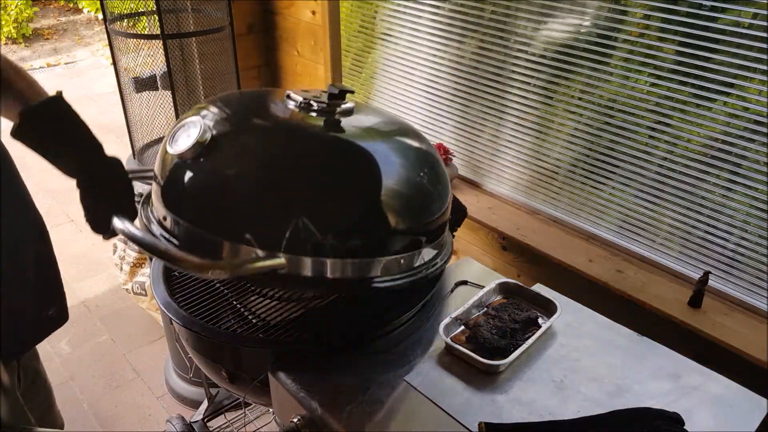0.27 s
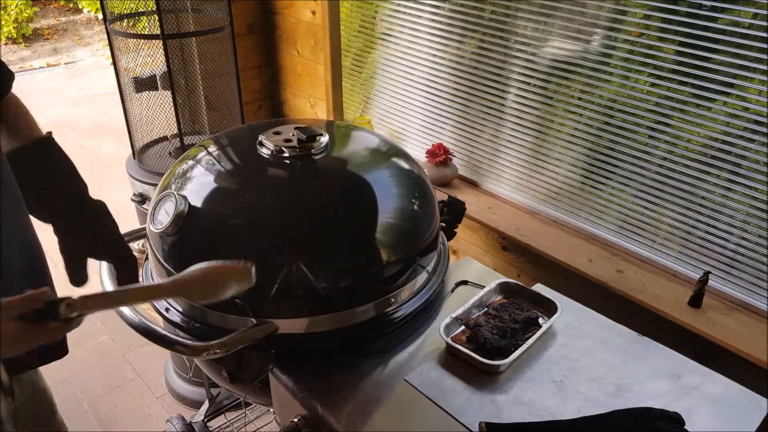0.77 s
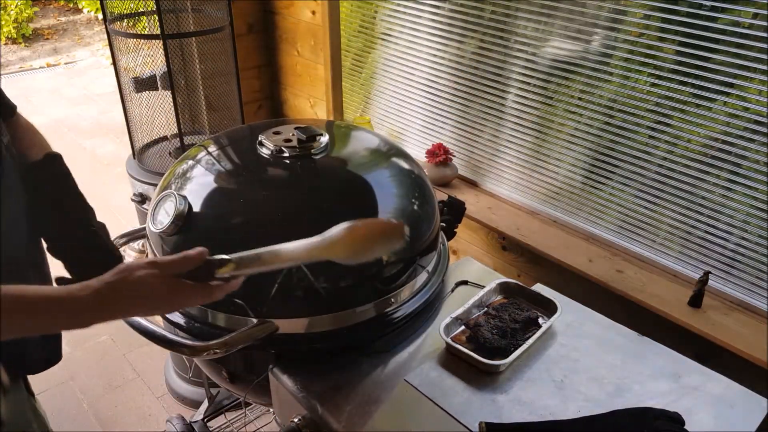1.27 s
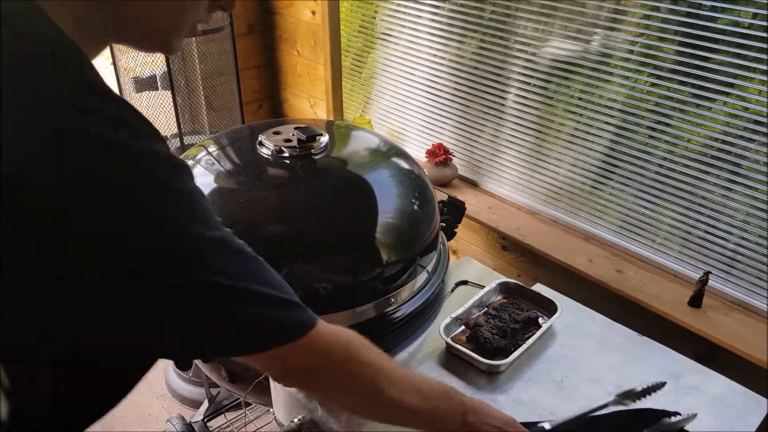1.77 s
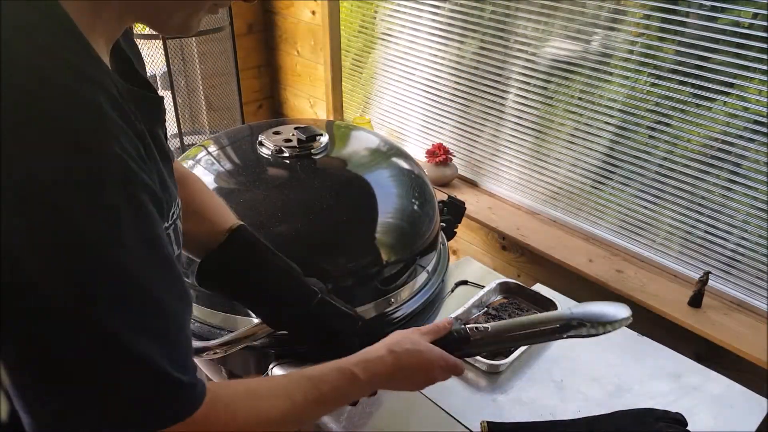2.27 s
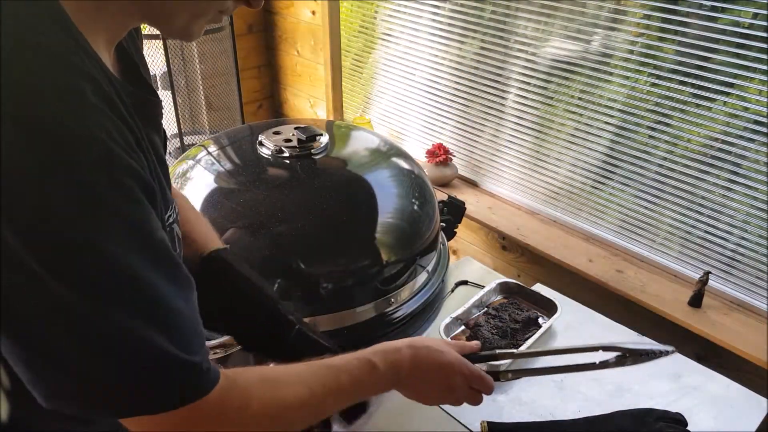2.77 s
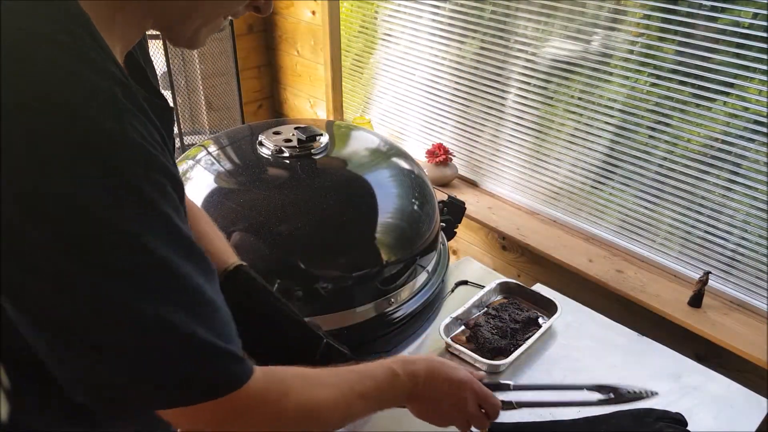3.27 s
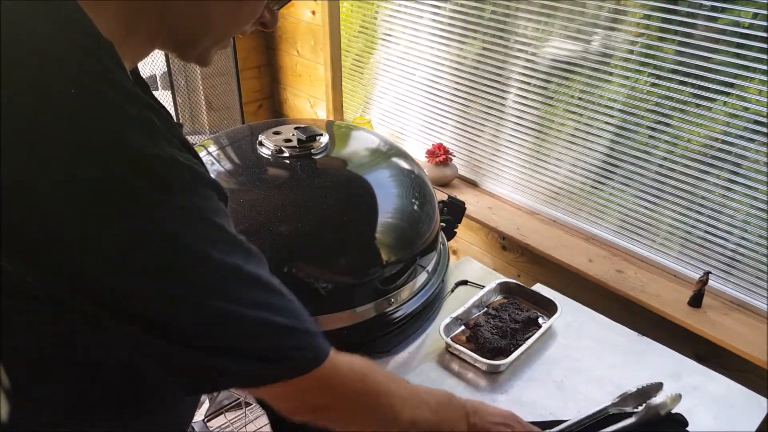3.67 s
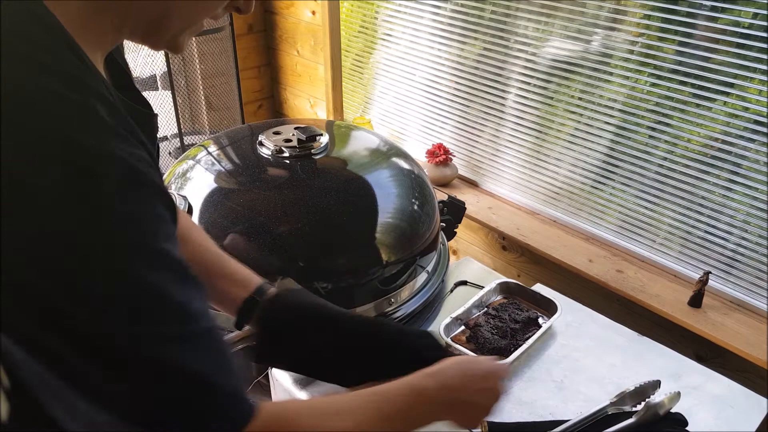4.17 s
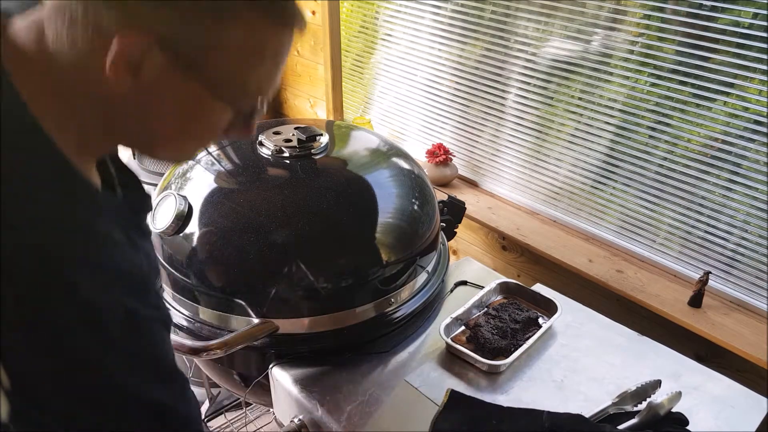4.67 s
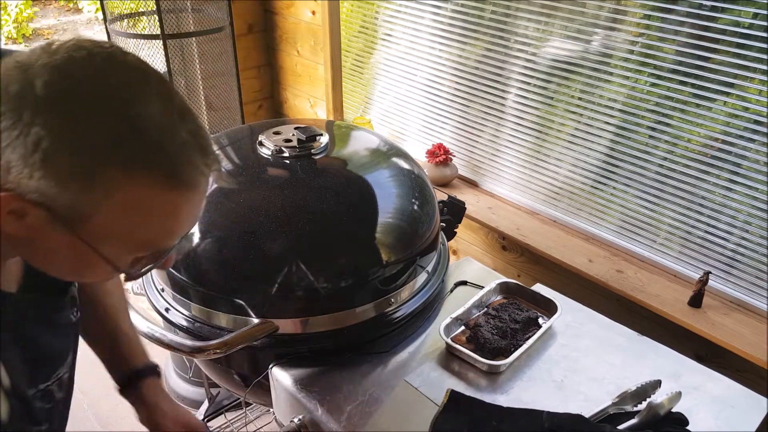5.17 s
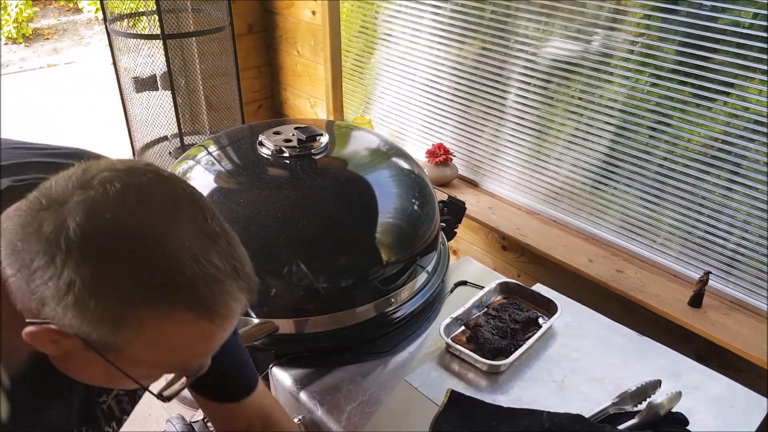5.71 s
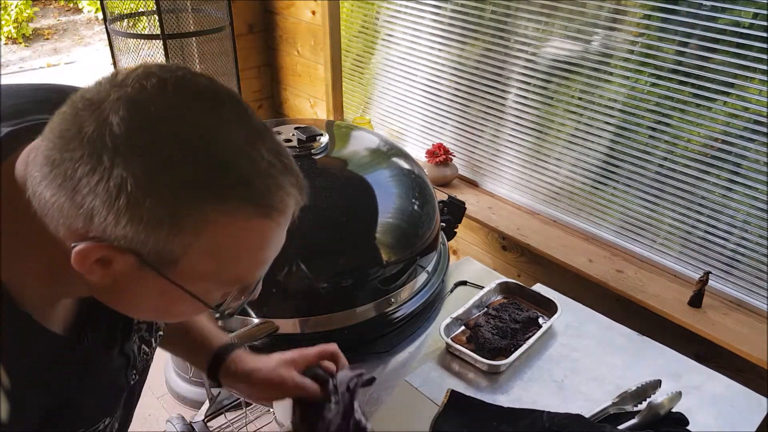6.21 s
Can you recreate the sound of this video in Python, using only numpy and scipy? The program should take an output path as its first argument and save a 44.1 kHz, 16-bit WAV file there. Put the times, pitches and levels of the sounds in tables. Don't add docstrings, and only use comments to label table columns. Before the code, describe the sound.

In a small wooden hut, a dry hinge squeaks downward in pitch and a steel kettle lid shuts with a clank and low thump. Metal tongs click, slap a sheet-steel table, clack several times and drop with a loud boom and rattle. Finally a wire basket is dragged below in ringing, gritty scrapes. Close stereo microphone, slightly right, short clipped tails over faint rumble and hiss.

```python
import sys
import numpy as np
from scipy import signal
from scipy.fft import rfft, irfft, next_fast_len
from scipy.io import wavfile
from scipy.ndimage import uniform_filter1d

SR = 44100
rng = np.random.default_rng(int(sys.argv[2]) if len(sys.argv) > 2 else 0)


def unload_audio(sound):
    columns = np.transpose(np.atleast_2d(sound))
    steps = np.round(np.clip(columns, -1, 1) * 32767)
    wavfile.write(sys.argv[1], SR, steps.astype(np.int16))


def makeup_ratio(level_db):
    decades = np.asarray(level_db, float) / 20
    return 10 ** decades


N = 284312

TOP_HZ = 15780
BLUR = .09


def unit(x):
    return x / np.sqrt(np.mean(x ** 2) + 1e-20)


def along(points, hz):
    f, v = np.transpose(points)
    return np.interp(np.log(hz + 1), np.log(f + 1), v)


def curves(rows, off=-120):
    s, *cols = np.transpose(rows)
    return [np.interp(np.arange(N) / SR, s, c, off, off) for c in cols]


def wobble(rate):
    knots = rng.standard_normal(int(N * rate / SR) + 2)
    return np.interp(np.arange(N) * rate / SR, np.arange(len(knots)), knots)


def modes(table, f):
    total = 0
    for k, (c, w, db) in enumerate(table):
        total = total + (-1) ** k * makeup_ratio(db) * 1j * f * w / (c * c - f * f + 1j * f * w)
    return total


def causal(db):
    c = irfft(db * np.log(10) / 20)
    c[1:len(c) // 2] *= 2
    c[len(c) // 2 + 1:] = 0
    return np.exp(rfft(c))


def spread(pair, response):
    # frequency in Hz, left-right likeness (1 is mono).
    alike = [(60, 1), (150, 0.75), (300, 0.83), (640, 0.66), (1400, 0.048), (16000, 0)]
    m = next_fast_len(pair.shape[1] + 2048, True)
    hz = np.fft.rfftfreq(m, 1 / SR)
    turn = np.arccos(np.clip(along(alike, hz), -1, 1)) / 2
    spectrum = rfft(pair, m) * response(hz) * [np.cos(turn), np.sin(turn)]
    mid, side = irfft(spectrum, m)[:, :pair.shape[1]]
    return np.array([mid + side, mid - side])


def noise(depth_db=0, rate=300):
    return rng.standard_normal((2, N)) * makeup_ratio(depth_db * wobble(rate))


def air():
    # time in seconds,
    # gain in dB.
    background_gain = [(0, 9.5), (.07, 7.5), (.2, 0.5), (.77, -1.5), (.95, 2.5), (1.3, -1), (1.6, -2), (1.94, 1),
                       (2.26, -2), (3.01, -1), (3.57, -3), (3.82, 22), (3.93, 6.5), (4.24, 3.5), (4.6, -5),
                       (4.87, -3.5), (5.7, -1.5), (6.03, 2), (6.45, 5)]
    # frequency in Hz, level in dB per Hz.
    quiet = [(20, -61), (35, -10.5), (52, 2.5), (85, -10), (175, -12.5), (400, -11.5), (1000, -19),
             (1550, -27.5), (2100, -28.5), (2750, -34), (3300, -37.5), (5000, -36), (8000, -41.5),
             (15000, -38.5)]
    # pitch in Hz, width in Hz, level in dB.
    hum = [(2670, 56, -8)]
    background_db = curves(background_gain, off=0)[0]

    def band(lo_hz, hi_hz):
        return lambda f: makeup_ratio(along(quiet, f)) * f ** 4 / (f ** 4 + lo_hz ** 4) / (1 + (f / hi_hz) ** 4)

    rumble = unit(spread(noise(), band(24.0, 161.0)))
    murmur = unit(spread(noise(), band(147.0, 1700.0)))
    hiss = unit(spread(noise(), lambda f: band(1670.0, 23000.0)(f) * (1 + modes(hum, f))))
    early_db = 3 * np.clip(1 - np.arange(N) / SR / 0.55, 0, 1) ** .5
    rumble_db = -52 + 0.33 * background_db + 2.4 * wobble(17)
    murmur_db = -65 + background_db + early_db + 2 * wobble(11)
    hiss_db = -64 + 1.2 * background_db + 1.6 * wobble(20.86)
    return makeup_ratio(rumble_db) * rumble + makeup_ratio(murmur_db) * murmur + makeup_ratio(hiss_db) * hiss


def hinge():
    # time in seconds, pitch in Hz, level in dB.
    squeak = [(0, 6390, -46), (.04, 7000, -50), (.06, 7650, -51), (.11, 6530, -52.5), (.17, 6240, -52),
              (.2, 5760, -52.5), (.25, 4390, -46.5), (.3, 3066, -58.5), (.36, 1715, -59.5)]
    # start in seconds, length in seconds, first and last pitch in Hz, peak in dB.
    chirps = [
        (0.08, .15, 4750, 4140, -62),
        (.57, .12, 4750, 4120, -61),
        (5.74, .11, 5000, 3570, -74),
    ]
    # time in seconds, level in dB.
    hiss_curve = [(0, -84), (.06, -54.5), (.12, -59), (.18, -84), (.24, -58), (.32, -48.5), (.4, -54), (.5, -73),
                  (.6, -61.5), (.7, -58.5)]
    hz, level_db = curves(squeak)
    slow = np.clip(1 - np.abs(hz) / 6000, 0, 1)
    fuzz = .019 + .05 * slow
    turns = 2 * np.pi * np.cumsum(np.abs(hz) * (1 + fuzz * wobble(500))) / SR
    overtones = np.sin(2 * turns)
    for k in (3, 4, 5):
        overtones = overtones + makeup_ratio(-2.5 * k + 3) * np.sin(k * turns) * (k * hz < TOP_HZ) * (hz > 0)
    over_db = level_db + 2 + 19 * np.log2(np.abs(hz) / 6300)
    tone = makeup_ratio(level_db) * np.sin(turns) + makeup_ratio(over_db) * overtones
    for s, length, first_hz, last_hz, db in chirps:
        glide = []
        for u, edge_db in [(0, 2.5), (.4, 0), (1, 5)]:
            glide.append((s + u * length, first_hz + u ** 0.34 * (last_hz - first_hz), db - edge_db))
        hz, level_db = curves(glide)
        turns = 2 * np.pi * np.cumsum(np.abs(hz) * (1 + .028 * wobble(1200))) / SR
        tone = tone + makeup_ratio(level_db) * np.sin(turns)
    t = np.arange(SR // 5) / SR
    tail = rng.standard_normal((2, len(t))) * makeup_ratio(-60 * t / .07)
    wet = signal.fftconvolve(tone[None], tail / np.linalg.norm(tail[0]), axes=1)[:, :N]
    tilt = [(900, -24), (2500, -4.5), (4500, -2.5), (7000, -11.5), (11000, -1.0), (15000, -5.5)]  # (Hz, dB)
    hiss = unit(spread(noise(0.46, 42.0), lambda f: makeup_ratio(along(tilt, f))))
    return makeup_ratio(1) * tone * makeup_ratio(1.9 * wobble(60)) + makeup_ratio(5) * wet + makeup_ratio(curves(hiss_curve)[0] + 3) * hiss


def knocks():
    # start in seconds, peak in dB, main mode in Hz, second mode in Hz, t60 in seconds.
    thuds = [(.25, -56.5, 330, 523, 0.24), (.76, -47.5, 496, 554, 0.4), (0.779, -53, 2205, 2450, 0.33),
             (0.924, -49, 357, 444, 0.095), (0.997, -47, 2450, 1700, 0.25), (1.067, -48.5, 448, 631, 0.31),
             (1.125, -42, 633, 497, 0.19), (1.14, -43, 660, 1040, 0.032), (1.344, -51, 507, 876, 0.05),
             (2.376, -27, 1180, 2250, 0.016), (2.38, -46, 1180, 1650, 0.25),
             (2.499, -53.5, 1800, 950, 0.24), (2.604, -41.5, 5730, 4230, 0.028),
             (3.015, -38, 1180, 1523, 0.043), (3.096, -41, 395.3, 1106, 0.021),
             (3.2647, -40, 772.6, 2150, 0.038), (3.268, -47.5, 2580, 1510, 0.076),
             (3.339, -37.5, 770, 1610, 0.043), (3.343, -50.5, 2310, 1160, 0.071),
             (2.377, -40, 2700, 3300, 0.044), (3.72, -33.5, 176, 125, 0.19),
             (2.885, -63.5, 2730, 1895, 0.28), (5.58, -46, 674, 748, 0.28), (3.61, -43.5, 2520, 4400, 0.18),
             (3.64, -43, 308, 690, 0.14), (3.6913, -25.5, 835, 1424, 0.047), (3.709, -29, 1893, 4800, 0.26),
             (3.74, -39, 2090, 1300, .15), (3.735, -33, 367.3, 294.5, 0.37), (3.71, -33.5, 425, 454, 0.16),
             (4.391, -38, 494, 1267, 0.052), (4.8, -59, 283, 348, 0.88), (5.92, -57.5, 279.5, 348, 0.35),
             (4.973, -45, 280, 327, 0.21)]
    # delay in seconds, level in dB.
    walls = [(.0031, -2), (.0052, -9.5), (.0088, -10.5), (.0131, -4.5), (.0187, -9), (.026, -9)]
    out, t = np.zeros(N + SR), np.arange(SR // 4) / SR
    for s, db, low_hz, high_hz, t60 in thuds:
        steps = np.cumsum(rng.standard_normal((2, len(t))), axis=1)
        drift = steps * BLUR * np.sqrt([[low_hz / 1000], [high_hz / 1000]])
        ring = np.sin(2 * np.pi * low_hz * t + drift[0])
        ring = ring + makeup_ratio(-3) * np.sin(2 * np.pi * high_hz * t + drift[1])
        out[round(s * SR):][:len(t)] += makeup_ratio(db - 60 * t / t60) * ring

    def late(s):
        return np.roll(out, round(s * SR))[:N]

    sides = []
    for lag, stretch in [(0.0, 0.87), (0.0006, 0.93)]:
        side = late(lag)
        for k, (s, db) in enumerate(walls):
            side = side + (-1) ** k * makeup_ratio(db) * late(s * stretch)
        sides.append(side)
    return np.array(sides)


def clacks():
    # start in seconds, treble peak in dB, weight of the blow in dB, tail in seconds.
    lid = [
        (0.5095, -51, -6, 0.13),
        (0.6975, -26.5, -9.5, 0.1),
        (0.7803, -40.5, -0.5, 0.026),
        (0.923, -77, 3, .09),
        (1.1021, -38, -1.5, 0.05),
        (1.344, -62, 11, 0.13),
    ]
    tongs = [(0.9714, -30, -12.5, 0.2), (0.9903, -22, -19, 0.044), (1.2856, -52, -39, 0.18),
             (2.608, -24, -16, 0.042), (2.6346, -35, -12.5, 0.051), (2.7277, -42, -11.5, 0.18),
             (2.803, -42, -10.5, 0.019), (2.8836, -68, 8, 0.037), (2.9929, -27.5, -18, 0.066),
             (3.0199, -27, -12, 0.042), (3.0942, -65, 14, 0.048), (3.265, -42.5, -2.5, 0.11),
             (3.3391, -36.5, -4.5, 0.063), (3.446, -53, 2.5, 0.031), (3.4596, -27, -13.5, 0.07)]
    tips = [
        (1.142, -25.5, -12, 0.041),
        (2.3766, -21, -10.5, 0.048),
        (3.568, -32, -25, 0.1),
        (3.6095, -17.5, -25.5, 0.035),
        (3.6918, -8.5, -10, 0.08),
        (3.696, -18, -51, .03),
    ]
    grazes = [(1.205, -41, -15, 0.046), (1.32, -53, -18, 0.045), (1.49, -46.5, -18, 0.13),
              (1.764, -48.5, -30, 0.035), (4.681, -55.5, -23, 0.11), (1.3563, -18.5, -22.5, 0.059),
              (4.81, -53, -25, .04), (5.92, -49.5, -16, 0.055), (1.5566, -34.5, -26.5, 0.067),
              (1.6107, -36, -23, 0.074), (1.639, -34, -18, 0.03), (1.689, -43.5, -20, 0.31),
              (2.0293, -33.5, -22, 0.033), (2.111, -37, -26, 0.051), (2.1787, -32.5, -22.5, 0.057),
              (2.21, -40, -12.5, 0.045), (6.062, -47, -12.5, 0.15)]
    table = [
        (1.8254, -11.5, -18.5, 0.068),
        (1.8912, -17, -18, 0.044),
        (1.9193, -30, -14.5, 0.32),
        (2.3244, -44, -3.5, 0.28),
        (2.439, -35, -10.5, 0.09),
        (2.487, -36, -10.5, 0.064),
        (3.6477, -31.5, -6, 0.14),
        (3.7191, -20.5, -3.5, 0.12),
        (3.78, -18, -41, 0.024),
        (3.8185, -20.5, -37, 0.037),
    ]
    wires = [(4.391, -54, 9, 0.052), (4.412, -42.5, -2.5, 0.12), (4.49, -42.5, -7, .06),
             (4.5235, -40, -6, 0.072), (4.848, -43.5, -15, 0.15), (4.911, -24, -23, 0.041),
             (5.0102, -24.5, -17, 0.04), (5.034, -15, -41, 0.028), (5.2366, -31, -9, 0.042),
             (5.314, -19.5, -12, 0.18), (5.562, -28.5, -27, 0.12), (6.191, -36, -15, 0.03),
             (6.1961, -27.5, -6.5, 0.07), (6.264, -23, -31, .03), (6.2676, -11, -26, 0.054),
             (6.377, -11, -24, 0.05), (6.384, -7, -19, 0.12)]
    presence_db = (-2.3, -1.6, -5.5, 8, -0.5, 2)
    # frequency in Hz, level in dB.
    sheen = [(4000, -2.5), (6000, 0), (8300, 0), (10000, 4), (13000, 7.5), (14300, 2.5), (15600, 4.5)]
    objects = [(lid, -1.7, -2.5), (tongs, 1.7, -0.38), (tips, 0, 0),
               (grazes, -23, -1.2), (table, 5.1, -3.7), (wires, 1.9, -3.5)]
    low_t60, high_t60 = 0.8, 0.49
    out, t = np.zeros((2, N + SR)), np.arange(9000) / SR
    rise = 1 - 0.9 * np.exp(-t / 0.0068)
    tick = 0.72 * makeup_ratio(-60 * t / 0.0074) + 0.35 * (1 - np.exp(-t / 0.0017)) * makeup_ratio(-60 * t / 0.041)

    def strike(db, weight_db, tail, lows_db, lean_db, near_db):
        low_db, lean_db = lows_db + 1.39 * weight_db, lean_db - 0.153 * weight_db
        closing = -9 * (t / np.clip(tail, .015, .3)) ** 1.3 - 30 * (t / t[-1]) ** 9
        grains = np.repeat(rng.standard_normal(size=len(t) // 25), 25)
        sparse = makeup_ratio(1.44 * np.exp(-t / 0.037) * grains)
        dull = rng.standard_normal((2, len(t))) * makeup_ratio(-60 * t / low_t60 + 0.49 * closing)
        dull = dull * (1 - np.exp(-t / 0.0051))
        echoes = makeup_ratio(-60 * t / high_t60 + closing) * rise
        bright = rng.standard_normal((2, len(t))) * (echoes + tick) * sparse
        body = [(90, low_db - 6), (200, low_db + 13.0), (600, low_db + 16.5), (1300, low_db + 12.0),
                (2200, low_db - 6.0)]
        edge = [(700, weight_db - 0.5), (1900, weight_db + 18.0), (2900, weight_db + near_db + 16.0),
                (4300, 2.5 - lean_db), (15000, -2.5 + lean_db)]
        crowd_db = 2.2 * rng.standard_normal(size=160)
        crowd_hz = np.linspace(0, SR / 2, len(crowd_db))

        def shine(f):
            return causal(along(edge, f) + along(sheen, f) + np.interp(f, crowd_hz, crowd_db))

        return makeup_ratio(db - 8) * (spread(dull, lambda f: makeup_ratio(along(body, f))) + spread(bright, shine))

    for (rows, lows_db, lean_db), near_db in zip(objects, presence_db):
        for s, db, weight_db, tail in rows:
            blow = strike(db, weight_db, tail, lows_db, lean_db, near_db)
            out[:, round(s * SR):][:, :len(t)] += blow
    return out[:, :N]


def booms():
    # start in seconds, peak in dB, pitch in Hz, panel mode in dB over the low, t60 in seconds.
    swells = [(0.713, -28.5, 59.2, -28.5, 0.36), (0.936, -38.5, 74, -29, 0.27),
              (1.098, -31, 59.6, -35, 0.11), (1.863, -32, 70, -8.5, 0.26), (1.935, -44.5, 77.4, -29, 1),
              (2.18, -42.5, 56, -38, 0.47), (3.708, -19, 78.4, -4, 0.82), (4.451, -36, 68.4, -14, 0.23),
              (4.526, -41, 58.7, -23, 0.22), (4.797, -40, 78.3, -10.5, 0.43), (5.043, -38, 70.4, -29, 0.43),
              (5.35, -37, 75.6, -1.5, 0.46), (5.901, -49, 88, 5, 0.22)]
    out, t = np.zeros(N + SR), np.arange(SR // 2) / SR
    panel = np.sin(2 * np.pi * 232.3 * t)
    for s, db, hz, panel_db, t60 in swells:
        shape = (1 - np.exp(-(t / 0.0068) ** 2)) * makeup_ratio(-60 * t / t60 - 7.7 * (t / 0.23) ** 3)
        low = np.sin(2 * np.pi * hz * t) + .5 * np.sin(2 * np.pi * 1.19 * hz * t + 3.1)
        out[round(s * SR):][:len(t)] += makeup_ratio(db - 0.5) * shape * (low + makeup_ratio(panel_db) * panel)
    return out[:N]


def snaps():
    # start in seconds, peak in dB, pitch in Hz, cycles to fade by 60 dB.
    cracks = [(1.8244, -16, 11300, 170), (1.825, -12, 15000, 66), (1.8333, -12, 11400, 67),
              (1.835, -19, 6600, 25), (1.852, -28, 9500, 24), (1.8918, -28, 14000, 60),
              (1.894, -23, 10000, 46), (1.91, -15, 11200, 60), (1.3578, -31, 12700, 40),
              (1.363, -26, 3700, 17), (1.34, -26, 2500, 9.3), (5.2, -30, 3070, 12), (5.5698, -38, 2450, 12),
              (6.3, -15, 8500, 20), (6.398, -13, 9300, 27), (6.409, -18, 4000, 9.2),
              (2.3736, -18, 1320, 8.2), (2.36, -15, 12200, 160), (2.8, -42, 2100, 12),
              (3.268, -39, 780, 5.7), (3.3387, -30, 900, 4.2), (3.27, -36, 1100, 2.9),
              (3.3428, -35, 6400, 53), (2.609, -28, 12500, 25), (2.6125, -29, 6000, 12),
              (2.9936, -31, 12000, 40), (3.0225, -23, 11000, 34), (1.1465, -23, 13500, 43),
              (3.6108, -28, 12450, 25), (3.612, -18, 12000, 25), (3.616, -12, 13000, 32),
              (3.6907, -13, 1160, 3.7), (3.692, -6, 14700, 40), (3.82, -4, 13000, 50), (3.7, -9, 15000, 40),
              (3.4608, -28, 10000, 30), (2.1112, -40, 12000, 29.3), (1, -37, 14000, 30),
              (3.6095, -23, 15000, 30), (2.8, -35, 770, 2.6), (1.147, -24, 11600, 60),
              (3.2658, -37, 5700, 15), (3.3407, -27, 1700, 8.9), (2.3765, -21, 2000, 6.8)]
    out, t = np.zeros(N + SR), np.arange(SR // 50) / SR
    for s, db, hz, cycles in cracks:
        out[round(s * SR):][:len(t)] -= makeup_ratio(db + 1.5 - 60 * t * hz / cycles) * np.sin(2 * np.pi * hz * t)
    return out[:N]


def rings():
    # start in seconds, peak in dB, pitch in Hz, second wire in Hz, t60 in seconds.
    notes_sung = [(4.402, -41.5, 288, 654, 0.3), (4.52, -42, 362, 239, 0.19), (4.915, -36, 761, 1200, 0.28),
                  (4.935, -39.5, 2020, 2990, 0.55), (4.96, -49, 2530, 6340, .3),
                  (5.02, -33.5, 711, 11000, 0.24), (5.038, -31.5, 1278, 4430, 0.28),
                  (5.12, -47, 672, 1203, 1), (5.234, -27, 2034, 3170, 0.086), (5.25, -30.5, 840, 604, 0.11),
                  (5.335, -25, 1438, 3125, 0.2), (5.321, -32, 1507, 1234, 0.3), (5.38, -40, 303, 602, 0.36),
                  (5.565, -40, 735, 1553, 0.39), (5.575, -37, 2450, 6170, 0.2),
                  (6.2, -35, 2020, 6200, 0.27), (6.275, -34, 598, 5350, 0.27), (6.294, -31, 6100, 1980, .1),
                  (6.33, -31, 755, 1472, 0.21), (6.382, -26, 6000, 6176, 0.19),
                  (6.39, -25, 1467, 9100, 0.36), (6.404, -28, 609, 237, .4), (3.92, -53, 692, 520, 0.53),
                  (5.93, -67, 607, 448, 0.37), (6.03, -64, 743, 996, .3), (5.62, -42.5, 596, 874, 0.46)]
    out, t = np.zeros((2, N + SR)), np.arange(SR // 3) / SR
    swell = 1 - np.exp(-(t / 0.0085) ** 2)
    for s, db, low_hz, high_hz, t60 in notes_sung:
        hz = np.array([[low_hz], [high_hz]])
        drift = BLUR * np.sqrt(hz / 2000) * np.cumsum(rng.standard_normal((2, len(t))), axis=1)
        turns = 2 * np.pi * hz * t + drift
        apart = rng.uniform(-1, 1, (2, 1)) * np.clip(hz / 1000, 0, 1.5)
        shape = makeup_ratio(db - 60 * t / t60) * swell * makeup_ratio([[0], [-5]])
        pair = [(shape * np.sin(turns + side * apart)).sum(0) for side in (-1, 1)]
        out[:, round(s * SR):][:, :len(t)] += pair
    return out[:, :N]


def patchy(x, depth_db):
    z = signal.stft(x, nperseg=256)[2]
    field = uniform_filter1d(rng.standard_normal(z.shape[1:]), size=4, axis=0)
    field = uniform_filter1d(field, size=5, axis=1)
    return unit(signal.istft(z * makeup_ratio(depth_db * unit(field)), nperseg=256)[1][:, :N])


def basket():
    # pitch in Hz, width in Hz, level in dB.
    resonances = [(271, 33, -7.5), (454, 6, 5.5), (603.7, 19.5, -1.5), (687, 9.1, 6), (753.5, 19, -1.5),
                  (1063, 11, 2.5), (1184, 4.7, -3), (1465, 17, 4.5), (1460, 15, -12), (2020, 6, 5),
                  (2450, 23, -5.5), (2582, 9.6, 0.5), (2745, 8.1, -1.5), (3250, 20, -1), (3683, 19, -3),
                  (5660, 20, -6), (5950, 11, -4), (6160, 16, 1.5), (9184, 22, -11), (9200, 16, 7),
                  (10530, 16, -2), (12900, 31, -17)]
    # frequency in Hz, level in dB per Hz.
    scrape = [(100, -4.5), (200, -1.5), (500, -3.5), (1000, -3.5), (2000, -3.5), (4000, -2), (9000, -5),
              (16000, -7)]
    # start in seconds, rise in seconds, body peak in dB, grit over body in dB, fall in dB per second.
    pulls = [(4.378, 0.027, -47.5, -17, 79), (4.5, 0.026, -52.5, -1, 168), (4.904, 0.043, -40, -1.5, 19),
             (4.96, 0.071, -36, 1.5, 39), (5.222, 0.013, -41.5, -3.5, 28), (5.307, 0.024, -37, 4, 111),
             (5.33, 0.037, -32, 1.5, 167), (5.518, 0.065, -39, -3.5, 113), (6.187, 0.028, -37, -13, 22),
             (6.25, 0.039, -27.5, 2.5, 30), (6.36, 0.04, -28, 6.5, 40)]

    def ringing(f):
        return makeup_ratio(along(scrape, f)) * (0.5 + 1.49 * modes(resonances, f))

    grit = unit(spread(noise(1.6, 500), lambda f: ringing(f) * f ** 4 / (f ** 4 + 1000.0 ** 4)))
    frame = unit(spread(noise(1.07, 90), lambda f: ringing(f) / (1 + (f / 3200) ** 4)))
    power, t = np.zeros((2, N + SR)), np.arange(SR // 2) / SR
    for s, rise, db, grit_db, fall in pulls:
        start = round(s * SR)
        after = np.clip(t - rise, 0, None)
        shape_db = -13.5 * np.clip(1 - t / rise, 0, 1) - fall * after - 100 * after ** 2
        levels_db = [db + grit_db + 1.78 * shape_db, db + shape_db]
        power[:, start:][:, :len(t)] += makeup_ratio(levels_db) ** 2
        power[1, start:][:len(t)] += makeup_ratio(db - 19 - 60 * after / 0.9) ** 2 * (t > rise)
    treble, body = np.sqrt(power[:, :N])
    return makeup_ratio(2.5) * treble * patchy(grit, depth_db=2.5) + makeup_ratio(1.0) * body * patchy(frame, depth_db=-0.5)


def scene():
    mix = air() + hinge() + knocks() + clacks() + booms() + snaps() + rings() + basket()
    left, right = mix * makeup_ratio([[-1.2], [1.2]])
    hz = np.fft.rfftfreq(N, 1 / SR)
    left = irfft(rfft(left) * makeup_ratio(-1.5 / (1 + (11000 / (hz + 1)) ** 6)), N)
    lag = round(.0002 * SR)
    return np.array([np.pad(left, (lag, 0))[:N], right])


def roll_off(x):
    return signal.sosfilt(signal.butter(12, 17040, fs=SR, output="sos"), x)


def record(dry):
    m = next_fast_len(N + SR // 4, True)
    hz = np.fft.rfftfreq(m, 1 / SR)
    low_cut = hz ** 2 / (hz ** 2 + 32.3 ** 2)
    top_cut = 1 / (1 + (hz / TOP_HZ) ** 260)
    mix = irfft(rfft(dry, m) * low_cut * top_cut, m)[:, :N]
    return roll_off(mix)


dry = scene()
out = record(dry)
unload_audio(out)
```